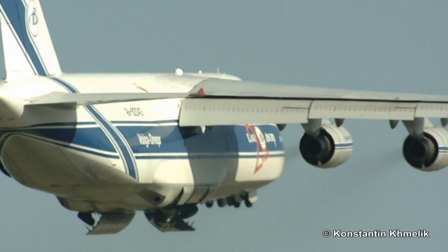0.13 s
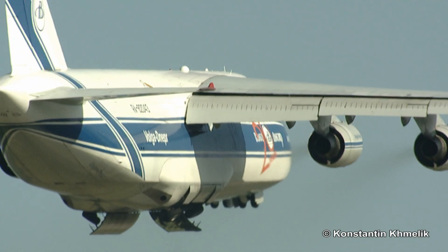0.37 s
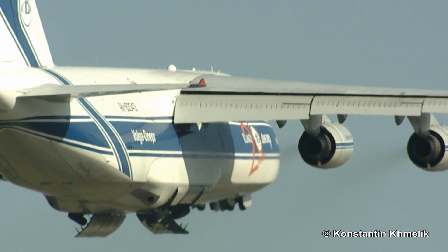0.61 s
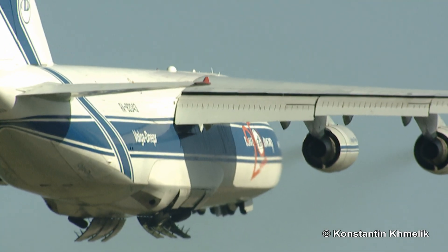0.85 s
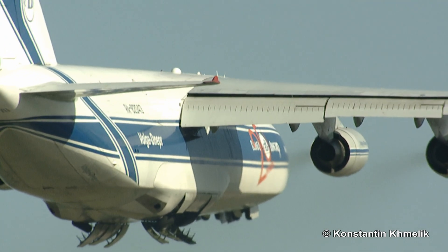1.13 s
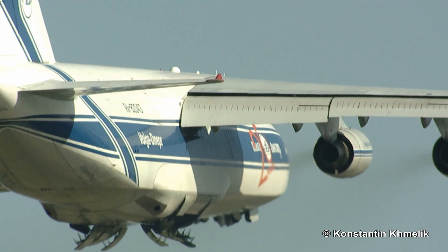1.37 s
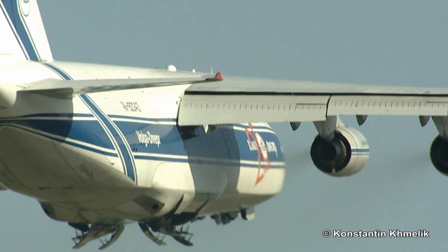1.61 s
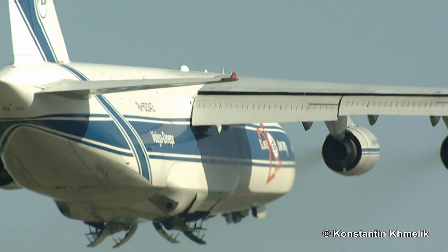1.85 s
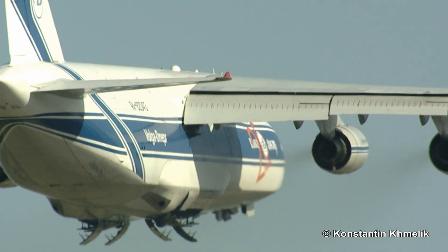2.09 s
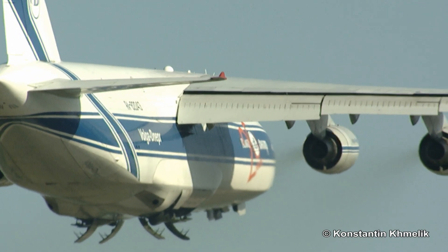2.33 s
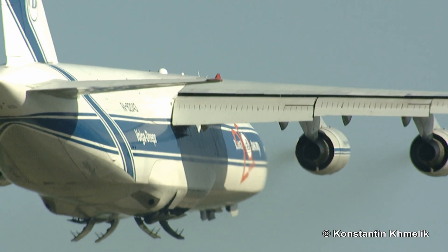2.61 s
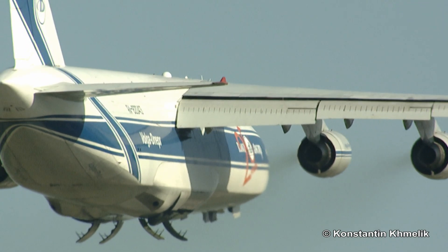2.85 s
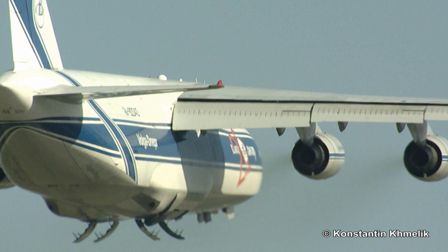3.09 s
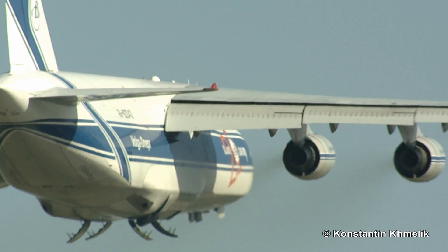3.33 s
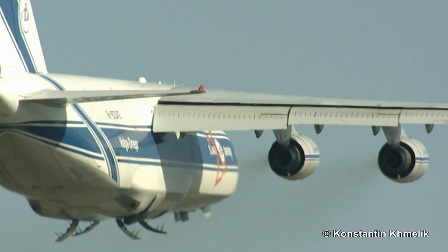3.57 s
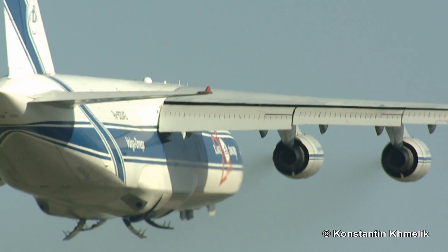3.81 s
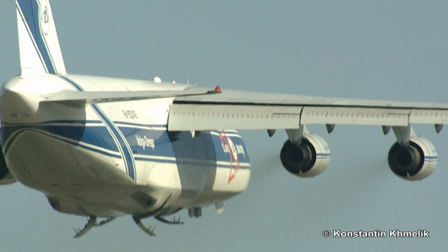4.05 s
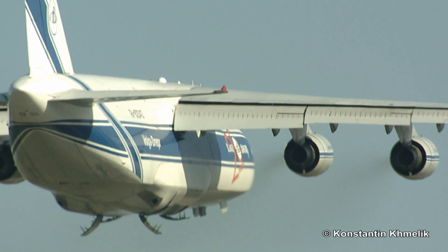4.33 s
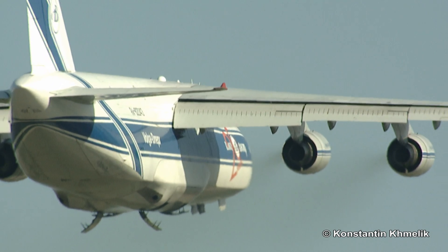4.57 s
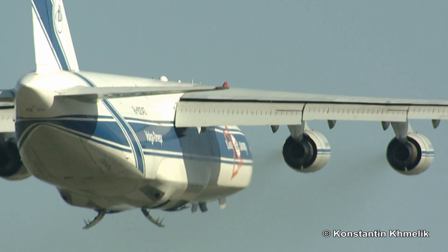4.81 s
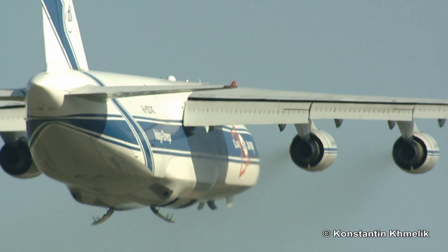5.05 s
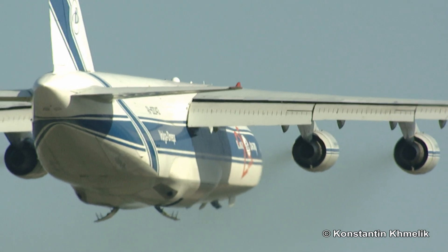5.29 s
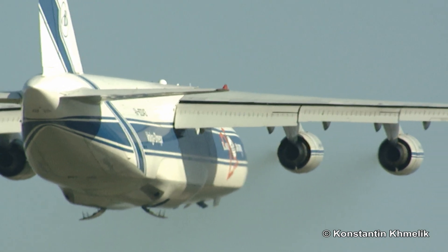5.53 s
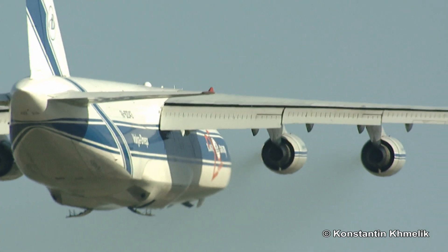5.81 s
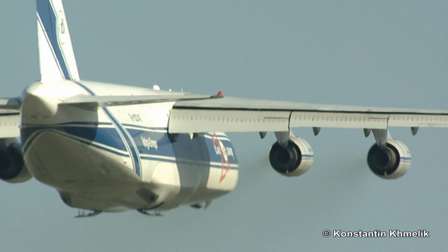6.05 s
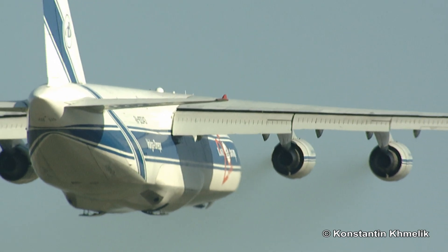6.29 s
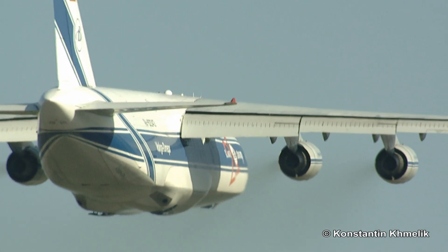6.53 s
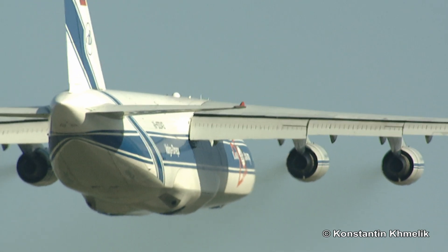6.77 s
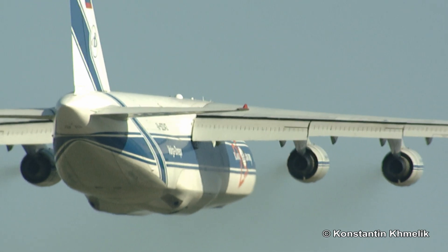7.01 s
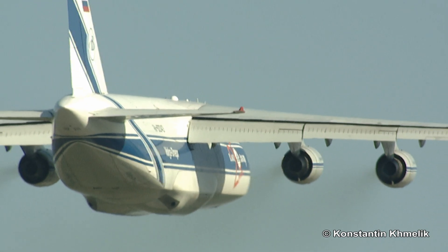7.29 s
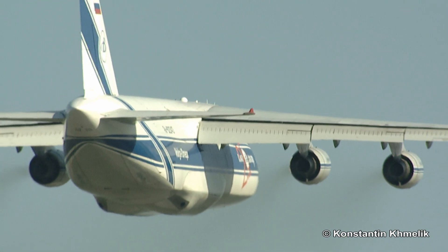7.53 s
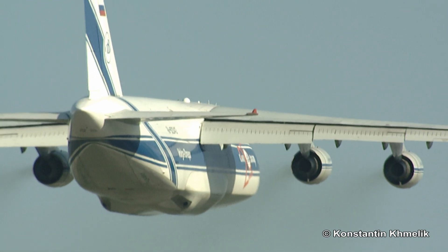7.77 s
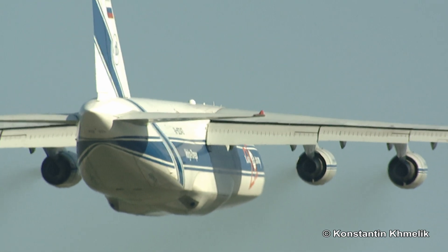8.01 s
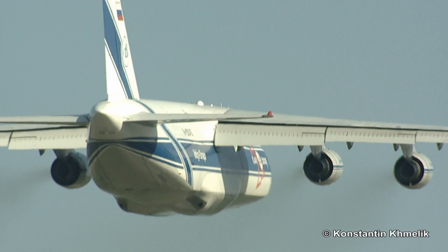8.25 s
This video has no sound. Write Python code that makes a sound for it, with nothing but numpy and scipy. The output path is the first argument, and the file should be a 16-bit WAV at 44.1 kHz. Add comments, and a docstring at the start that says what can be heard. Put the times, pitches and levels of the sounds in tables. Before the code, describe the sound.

Already at full roar, a heavy jet recedes after takeoff. Its bassy rumble flutters and thumps irregularly, while the rough roar shimmers in drifting patches, loses its upper edge and drops away. Nearly centred, slightly left, heard outdoors from a distance with no near reverberation. A weak steady-pitched hum surfaces twice, and handling ticks and hiss sit far beneath.

```python
"""Open ground, well behind a heavy four-engine jet that climbs away at takeoff power.
Its exhaust rumble is low noise of uneven, beating level; its roar is noise shaped by a ground echo, air loss
and patchy focusing. A shaft hum, one wavering sine, sits in it. Close by, at the camera's two microphones, are
faint noise hiss, noise rustle in flickering bursts, and a few ticks of short decaying tones with a little noise."""
import sys
import numpy as np
from scipy import signal
from scipy.fft import rfft, irfft, next_fast_len
from scipy.io import wavfile
from scipy.ndimage import uniform_filter1d, map_coordinates

SR = 44100
rng = np.random.default_rng(int(sys.argv[2]) if len(sys.argv) > 2 else 0)


def boost(x):
    """Linear amplitude factor 10**(x/20) for a level x in decibels (scalar or array-like)."""
    u = np.asarray(x, float) / 20
    return 10 ** u


def wav_out(sig):
    """Save sig, one row per channel (or a flat mono array), as 16-bit PCM at SR to the path in sys.argv[1]."""
    wavfile.write(sys.argv[1], SR, np.round(np.clip(np.atleast_2d(sig).T, -1, 1) * 32767).astype(np.int16))


N = 369558


def unit(x):
    """Scale to rms 1, over all channels together."""
    return x / np.sqrt(np.mean(x ** 2) + 1e-20)


def along(points, hz):
    """Read (frequency, value) points on a log frequency axis."""
    point_hz, value = np.transpose(points)
    return np.interp(np.log(hz + 1), np.log(point_hz + 1), value)


def curve(rows, t=None):
    """Read (time, value) rows along time, at every sample unless t is given."""
    row_s, value = np.transpose(rows)
    return np.interp(np.arange(N) / SR if t is None else t, row_s, value)


def wobble(rate):
    """A smooth random curve, rate knots a second."""
    knots = rng.standard_normal(int(N * rate / SR) + 4)
    return map_coordinates(knots, [np.arange(N) * rate / SR])


def filtered(x, response):
    """Multiply the spectrum of x by a response of frequency."""
    size = next_fast_len(N + 8192)
    hz = np.fft.rfftfreq(size, 1 / SR)
    return irfft(rfft(x, size) * response(hz), size)[..., :N]


def steadied(x, seconds, share):
    """Take out a share of a noise's own slow beating, then scale to rms 1."""
    window = int(seconds * SR)
    power = uniform_filter1d(uniform_filter1d(x ** 2, window), window)
    return unit(x / (np.abs(power) + 1e-9) ** (np.clip(share, 0, 1) / 2))


def left_right(mid, side):
    """Shared sound plus and minus opposed sound gives the left and right microphones."""
    return np.array([mid + side, mid - side])


def hiss():
    """The camera's own faint hiss: shaped noise whose level is grainy with sparse crackle."""
    # hiss shared by both microphones: hz, relative level_db (per Hz)
    mid_shape = [(3000, -40), (4000, -12), (4600, -12), (5300, -7), (5700, -12), (6600, -3), (7400, -5),
                 (8100, -9), (9500, -6), (10700, 0), (12400, -7), (13700, 0), (14200, -2), (14500, -11),
                 (15100, -11), (15300, -120)]
    # hiss opposed at the two microphones: hz, relative level_db (per Hz)
    side_shape = [(2500, -30), (4000, -3), (5100, -5), (6000, -2), (6800, -8), (7700, -1), (8800, -6),
                  (10000, -4), (11000, -1), (14200, 0), (14500, -11), (15100, -11), (15300, -120)]
    hiss_db = -70.5  # rms over the shared and opposed parts
    crackle = (rng.random((2, N)) < 15 / SR) * rng.exponential(size=(2, N))  # about 15 a second
    crackle = uniform_filter1d(crackle, size=90) * 90  # each lasts 90 samples
    grain = boost(.5 * wobble(15) + .6 * wobble(150)) + .5 * crackle
    shapes = lambda hz: boost([along(mid_shape, hz), along(side_shape, hz)])
    mid, side = boost(hiss_db) * unit(filtered(grain * rng.standard_normal((2, N)), shapes))
    return left_right(mid, side)


def ticks():
    """Tiny ticks of the camera body, each a short bright tone with a little noise, dying fast."""
    # ticks: start_s, tone_db (amplitude at onset), left_minus_right_db, tone_hz
    tick_rows = [(3.3894, -57, -1, 4640), (3.8494, -58.5, 7, 5220), (4.5294, -54, -1, 10600),
                 (5.365, -52.5, 1, 5140), (5.438, -53, 0.5, 10400), (7.679, -59, 7, 4650),
                 (8.008, -49, -15.5, 10400)]
    out = np.zeros((2, N + SR))
    t = np.arange(SR // 100) / SR
    decay_db = 60 * t / .004  # 60 dB in 4 ms
    for start_s, tone_db, pan_db, hz in tick_rows:
        burst = np.sin(2 * np.pi * hz * t) + .3 * np.diff(rng.standard_normal(len(t) + 1))
        level = boost(tone_db - decay_db + pan_db * np.array([[.5], [-.5]]))
        out[:, round(start_s * SR):][:, :len(t)] += level * burst
    return out[:, :N]


def rustle():
    """Faint shaped noise flickers in short bursts, mostly opposed at the two microphones."""
    # rustle spectrum: hz, relative level_db (per Hz)
    rustle_shape = [(2200, -38), (2900, -4.5), (3250, 3), (3600, -8), (4500, -14), (6000, -23), (9000, -61)]
    bursts = boost(2.5 * wobble(4) + 4.5 * wobble(60))
    noise = bursts * rng.standard_normal((2, N))
    mid, side = filtered(noise, lambda hz: boost(along(rustle_shape, hz)))
    return left_right(boost(-82) * unit(mid), boost(-70.5) * unit(side))


def hum():
    """A shaft tone, one sine; the engines differ slightly, so its pitch and level waver."""
    # the hum comes and goes: time_s, level_db (rms, before the wavering)
    hum_level = [(0, -51), (.6, -44), (1.7, -46), (2.3, -52), (3.1, -53), (3.6, -47.5), (4.8, -46),
                 (5.3, -49), (5.9, -57), (8.38, -58)]
    hum_hz = 220.2  # mid pitch
    phase = 2 * np.pi * np.cumsum(hum_hz + .5 * wobble(3)) / SR
    return boost(curve(hum_level) + 0.69 * wobble(7.2)) * np.sqrt(2) * np.sin(phase)


def rumble():
    """Deep exhaust rumble, low noise whose level rises and falls unevenly; its upper edge fades faster."""
    # deep rumble spectrum: hz, relative level_db (per Hz)
    deep_shape = [(9, -38), (15, -6.5), (24, -0.5), (33, 2), (49, 0), (70, -7.5), (90, -22.5), (120, -44),
                  (300, -120)]
    # upper edge of the rumble: hz, relative level_db (per Hz)
    boom_shape = [(50, -45.5), (75, 1.5), (95, 0.5), (120, -7), (140, -14), (165, -32.5), (400, -120)]
    # brief rises of the rumble's level: centre_s, rise_db
    rises = [(0.131, 10), (.379, 4), (.49, 3), (.68, 5.5), (.998, 11), (1.447, 5.5), (1.532, 6),
             (1.721, 5.5), (1.886, 8.5), (2.255, 2.5), (2.37, 7), (2.449, 4.5), (2.679, 8), (3.028, 6.5),
             (3.357, 7), (3.622, 6.5), (3.733, 8), (3.841, 5.5), (3.911, 6.5), (4.006, 11), (4.185, 6),
             (4.315, 6), (4.47, 6.5), (4.66, 7), (4.844, 7), (5.024, 4), (5.123, 7), (5.193, 8.5),
             (5.493, 7.5), (5.647, 8), (6.071, 9), (6.266, 9.5), (6.39, 7.5), (6.78, 3.5), (6.974, 6),
             (7.059, 7), (7.214, 6), (7.633, 3.5), (7.932, 5.5), (8.246, 5.5), (8.341, 4)]
    rise_s = 0.021  # Gaussian width of a rise
    rumble_db, rumble_fade_db_per_s, flutter_db = -21.5, 0.98, 0.5
    boom_db, boom_hold_s, boom_fade_db_per_s = -29.5, 1.27, 3
    t = np.arange(N) / SR
    deep = filtered(rng.standard_normal(N), lambda hz: boost(along(deep_shape, hz)))
    boom = filtered(rng.standard_normal(N), lambda hz: boost(along(boom_shape, hz)))
    rises_db = sum(rise_db * np.exp(-.5 * ((t - s) / rise_s) ** 2) for s, rise_db in rises)
    deep_db = rumble_db - rumble_fade_db_per_s * t + rises_db + flutter_db * wobble(22)
    boom_level_db = boom_db - boom_fade_db_per_s * np.maximum(t - boom_hold_s, 0)
    # steadying evens out most of the noise's own beating; the listed rises then shape its level
    deep = boost(deep_db) * steadied(deep, seconds=0.043, share=0.78)
    return deep + boost(boom_level_db) * unit(boom)


def ground(hz):
    """Direct sound plus its ground echo leave evenly spaced dips."""
    # echo off the ground: hz, strength (0-1)
    echo_strength = [(150, 0.34), (700, 0.27), (1300, 0), (2000, .1), (3000, 0)]
    echo_delay_ms, first_dip_hz = 1.806, 150
    turn = 2 * np.pi * (hz - first_dip_hz) * echo_delay_ms / 1000  # radians
    strength = np.clip(along(echo_strength, hz), 0, .95)
    return np.abs(1 - strength * np.exp(-1j * turn))


def roar():
    """Fine mixing noise through ground echo, air loss and turbulent focusing; two noises for a little width."""
    # the climb: time_s, level_db (of the roar before air loss and focusing)
    climb_level = [(0, -32.5), (.7, -32.5), (1.4, -34), (2.1, -35.5), (2.8, -36.5), (3.1, -37), (3.6, -37),
                   (4.3, -38), (5, -38.5), (5.6, -41.5), (6.2, -43.5), (7, -44.5), (7.7, -46.5),
                   (8.38, -46.5)]
    # roar spectrum before the ground echo: hz, relative level_db (per Hz)
    roar_shape = [(90, -38), (150, 0.5), (300, 1.5), (600, -4.5), (1000, -7.5), (1550, -6), (1900, -14),
                  (2400, -18.5), (3000, -35.5), (3800, -59), (5000, -110)]
    # parts of the roar swell or thin out for a while, with Gaussian widths in time and frequency:
    # centre_s, width_s, centre_hz, width_hz, change_db
    swells = [(0.842, 0.3, 2390, 450, 6), (.55, 0.35, 1536, 45, 5), (1.198, 0.2, 1436, 88.4, 10),
              (1, 0.91, 588, 40, 4), (1.0, 0.26, 1125, 80, 6.5), (3.065, .25, 1228, 80, 5),
              (3.158, .4, 650, 50.3, -7.5), (3.72, .22, 1020, 120, 6), (4.15, 0.3, 1034, 130, 7.5),
              (4.68, 0.39, 2220, 447, 3), (4.597, 0.17, 1620, 80.6, 3), (5.001, .6, 675, 40.1, -7.5),
              (5.303, 0.55, 1500, 90, 6), (5.5, 0.4, 1000, 150, 8), (7.2, 0.33, 1270, 350, 2),
              (7.4, 0.31, 2900, 200, 6.5)]
    air_db_per_khz, air_growth_per_s = 0.73, 0.12  # loss at the start; dB per kHz added each second
    hz, t, noise = signal.stft(rng.standard_normal((2, N)), SR, nperseg=1024)
    colour = boost(along(roar_shape, hz)) * ground(hz)
    # the level is set by the power from 180 to 680 Hz
    colour /= np.sqrt(np.mean(colour ** 2 * ((hz > 180) & (hz < 680))))
    hz = hz[:, None]
    air_loss_db = (air_db_per_khz + air_growth_per_s * t) * hz / 1000
    path_db = curve(climb_level, t=t) - air_loss_db
    for centre_s, width_s, centre_hz, width_hz, change_db in swells:
        in_time = ((t - centre_s) / width_s) ** 2
        in_frequency = ((hz - centre_hz) / width_hz) ** 2
        path_db = path_db + change_db * np.exp(-.5 * in_time - .5 * in_frequency)
    # the roar also shimmers in small random patches of time and frequency
    shimmer = uniform_filter1d(rng.standard_normal(noise.shape[1:]), size=8, axis=0)
    shimmer = uniform_filter1d(shimmer, size=10, axis=1)
    path_db = path_db + 1.02 * unit(shimmer)
    return signal.istft(noise * colour[:, None] * boost(path_db), SR, nperseg=1024)[1][:, :N]


def at_camera(centre, pair):
    """The far source is nearly the same at both microphones, a little louder on the left."""
    # left-right likeness of the paired noise: hz, correlation
    likeness = [(60, .999), (500, 0.99), (1200, .99), (2000, 0.97), (3000, .8)]
    # balance: hz, left_minus_right_db
    balance = [(60, 1.5), (150, 1.0), (390, 1.0), (1010, 1.5), (2600, 2)]
    turn = lambda hz: np.arccos(np.clip(along(likeness, hz), -1, 1)) / 2
    mid, side = filtered(pair, lambda hz: np.array([np.cos(turn(hz)), np.sin(turn(hz))]))
    ears = left_right(centre + mid, side)
    return filtered(ears, lambda hz: boost(along(balance, hz) * np.array([[.5], [-.5]])))


def scene():
    """The far jet at both microphones, plus the faint sounds at the camera."""
    near = hiss() + ticks() + rustle()
    return near + at_camera(hum() + rumble(), roar())


def band_limit(x):
    """A steep low-pass at the top of the band."""
    return signal.sosfilt(signal.butter(12, 15150, fs=SR, output="sos"), x)


def record(dry):
    """The finished mix as it is stored."""
    return band_limit(dry)


dry = scene()
out = record(dry)
wav_out(out)
```